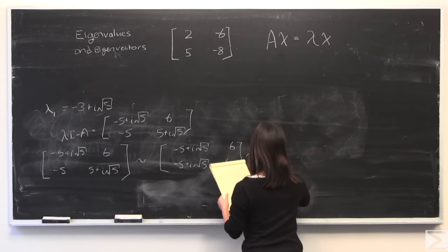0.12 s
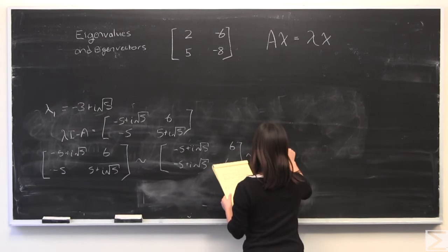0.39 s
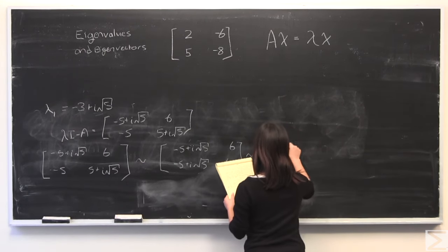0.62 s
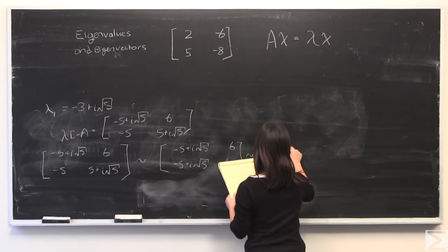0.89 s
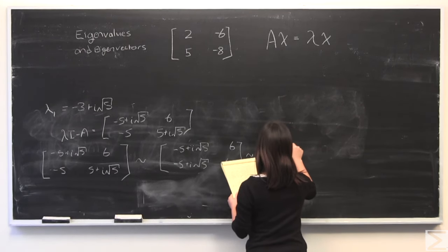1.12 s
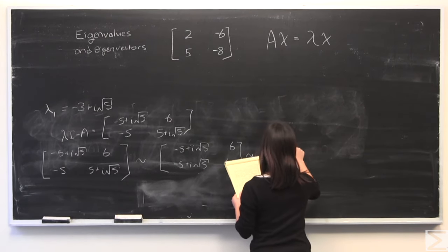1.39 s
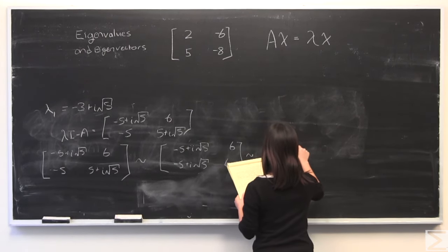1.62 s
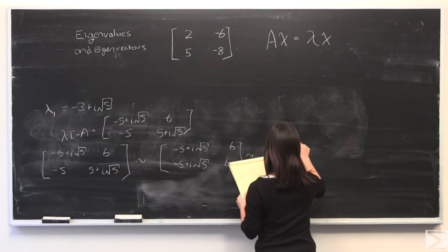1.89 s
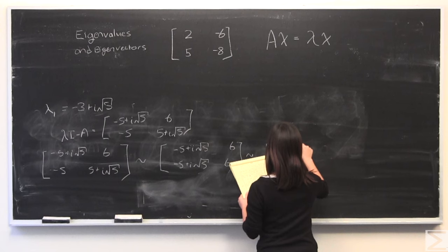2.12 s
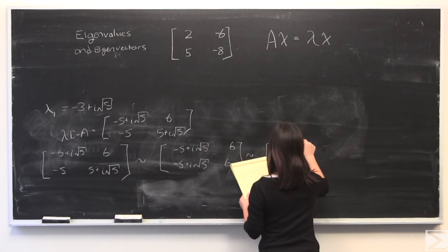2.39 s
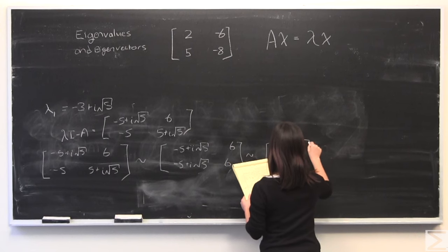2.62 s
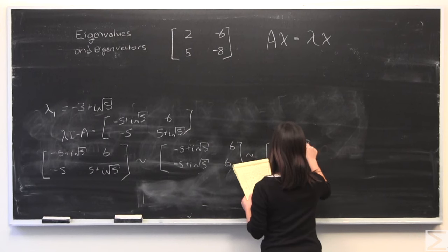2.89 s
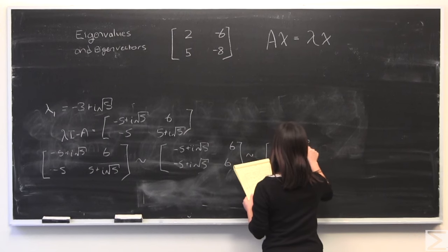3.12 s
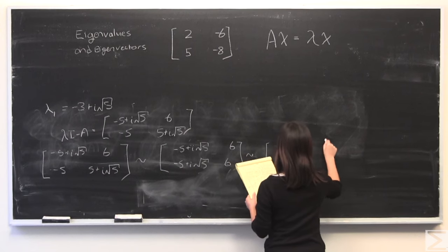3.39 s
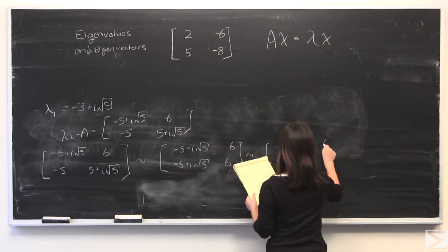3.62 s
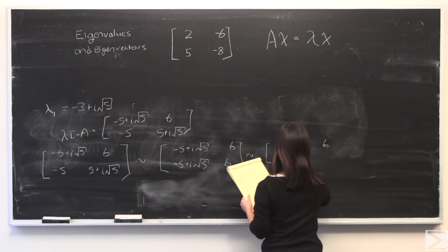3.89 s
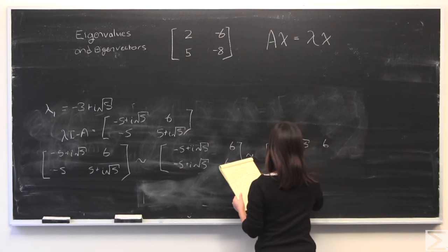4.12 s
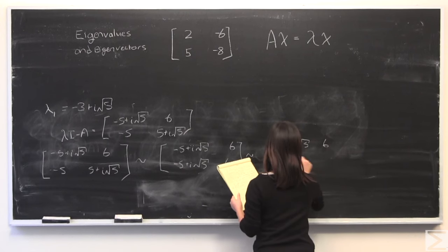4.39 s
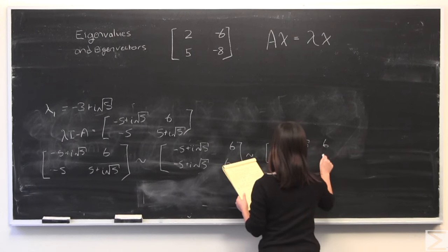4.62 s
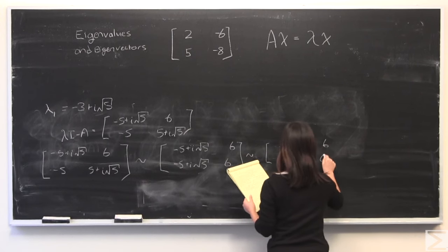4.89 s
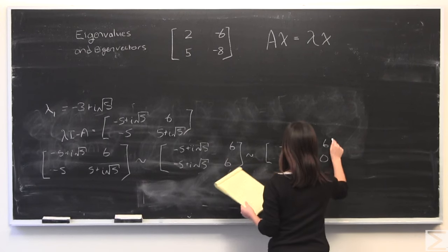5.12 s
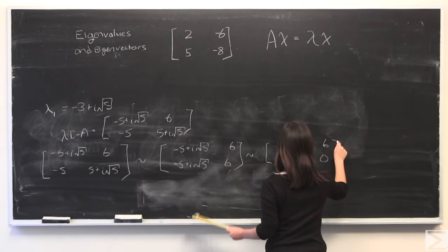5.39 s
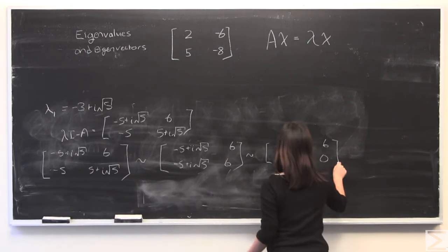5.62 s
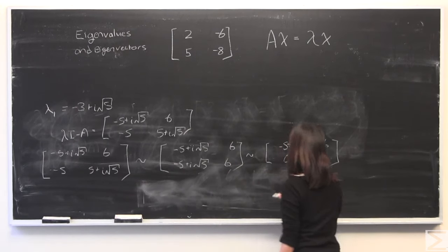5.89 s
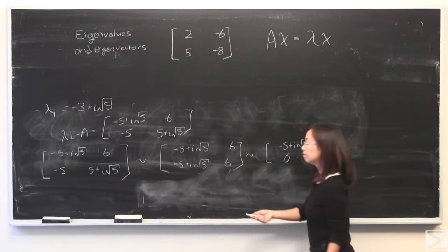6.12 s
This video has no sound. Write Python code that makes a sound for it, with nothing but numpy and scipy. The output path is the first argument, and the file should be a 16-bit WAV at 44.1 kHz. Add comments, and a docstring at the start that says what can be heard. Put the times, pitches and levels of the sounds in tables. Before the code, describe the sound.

In a small classroom, a stick of chalk strikes a blackboard with loud, woody, sharp taps at uneven intervals, each followed by a short room ring. Faint dry scrapes and barely audible squeaks accompany the strokes. Near the end come tiny ticks, two soft dull knocks on the ledge and light rustling. One distant microphone hears it over low ventilation hum and slight hiss.

```python
"""In a small classroom a stick of chalk taps and scrapes softly on a blackboard; soft knocks and rustles follow.
Taps and knocks ring damped modes of the board; scrapes, rustles and faint squeaks are shaped friction noise.
The writer's body dulls the direct knock; walls and ceiling return it brighter, then the room rings out.
One distant microphone feeds both channels over a ventilation hum of narrow tones and shaped noise;
each channel adds its own hiss."""
import sys
import numpy as np
from scipy import signal
from scipy.io import wavfile
from scipy.ndimage import uniform_filter1d

SR = 44100
rng = np.random.default_rng(int(sys.argv[2]) if len(sys.argv) > 2 else 0)


def convert_level_to_amplitude(level_db):
    """Map a level in decibels to its linear amplitude factor."""
    exponent = np.asarray(level_db, float) / 20
    return 10 ** exponent


def log_audio(samples):
    """Write samples as a 16-bit WAV file to the path given in sys.argv[1]."""
    # one column per channel
    frames = np.atleast_2d(samples).T
    # limit to full scale, then quantise
    limited = np.clip(frames, -1, 1)
    pcm = np.round(limited * 32767).astype(np.int16)
    wavfile.write(sys.argv[1], SR, pcm)


N = 276066


def evened(x):
    """Normalization: scales to an rms of 1."""
    return x / np.sqrt(np.mean(x ** 2) + 1e-20)


def read(points, hz):
    """Interpolation of a spectrum table on a log-frequency axis."""
    f, value = np.transpose(points)
    return np.interp(np.log(hz + 1), np.log(f + 1), value)


def add(mix, s, sound):
    """Superposition: mixes a sound in at time s."""
    part = mix[round(s * SR):][:len(sound)]
    part += sound[:len(part)]


def noise(shape_db, length, size):
    """Spectral shaping: random short-time spectra under a level shape_db(hz, t)."""
    hop = size // 4
    hz = np.fft.rfftfreq(size, 1 / SR)[:, None]
    t = np.arange(4 * length // size + 5) * size / 4 / SR
    real, imaginary = rng.standard_normal((len(t), len(hz), 2)).T
    spectra = (real + 1j * imaginary) * convert_level_to_amplitude(shape_db(hz, t))
    return signal.istft(spectra, nperseg=size, noverlap=size - hop)[1][:length]


def steady_noise(points, size):
    """Stationary noise of rms 1 with the tabled spectrum, as long as the scene."""
    return evened(noise(lambda hz, t: read(points, hz) + 0 * t, N, size))


# Spectrum of the amplifier hiss. Each row: frequency in Hz, relative density in dB.
HISS_SPECTRUM = [(15, -28.5), (25, 2), (244, -7), (347, -6.5), (377, -8), (921, -11.5), (5990, -10.5),
                 (13900, -13), (15100, -17.5), (16300, -46)]
HISS_DB = -59.5  # rms level


def amplifier_hiss():
    """Electronic noise: a stationary random signal, independent in each channel."""
    return convert_level_to_amplitude(HISS_DB) * steady_noise(HISS_SPECTRUM, size=1024)


# Faint steady tones beside the hum, probably mains. Each row: frequency in Hz, peak level in dB.
FAINT_TONES = [(180, -71), (240, -71.5)]


def faint_tones():
    """Pure tones: each is a steady sinusoid of random phase."""
    t = np.arange(N) / SR
    return sum(convert_level_to_amplitude(db) * np.sin(2 * np.pi * (hz * t + rng.random())) for hz, db in FAINT_TONES)


def ventilation_hum():
    """Narrow-band modulation: a strong steady tone plus slow random sidebands wavers a little."""
    hum_hz, width_hz, level_db = 152.7, 27, -59
    turn = np.exp(2j * np.pi * hum_hz * np.arange(N) / SR)
    pole = np.exp(-np.pi * width_hz / SR)
    waver = signal.lfilter([1], [1, -pole], rng.standard_normal(N) / turn)
    waver = signal.lfilter([1], [1, -pole ** 12.0], waver)
    steady = 8.1  # against a waver of 1
    return convert_level_to_amplitude(level_db) * evened((turn * (steady + waver / np.std(waver))).real)


# Spectrum of the soft air noise. Each row: frequency in Hz, relative density in dB.
AIR_SPECTRUM = [(80, -26.5), (120, 4), (200, 0.1), (330, -7), (450, -10), (700, -16.5), (1500, -20),
                (3000, -47)]
AIR_DB = -61  # rms level


def ventilation_air():
    """Flow noise: a stationary broad spectrum that falls towards the treble."""
    return convert_level_to_amplitude(AIR_DB) * steady_noise(AIR_SPECTRUM, size=2048)


# Brief swells of the rumble. Each row: centre in seconds, half width in seconds, rise in dB.
RUMBLE_SWELLS = [(1.15, 0.13, 11.5), (1.34, 0.049, 8), (2.548, .2, 2)]


def rumble_level_db():
    """Slow amplitude modulation: a sinking level with a random wander and a few swells."""
    start_db, sink_db_per_s, wander_rms_db = -58, -1.34, 3
    t = np.arange(N) / SR
    waves = [np.sin(2 * np.pi * (f * t + rng.random())) / np.sqrt(f) for f in np.geomspace(1, 5, num=16)]
    wander = evened(sum(waves))
    swells = sum(db * np.exp(-((t - s) / width) ** 2) for s, width, db in RUMBLE_SWELLS)
    return start_db + sink_db_per_s * t + wander_rms_db * wander + swells


# Spectrum of the low rumble. Each row: frequency in Hz, relative density in dB.
RUMBLE_SPECTRUM = [(15, -16), (30, -5), (55, 4.3), (90, -13.5), (130, -15), (200, -54)]


def rumble():
    """Low-frequency noise: a stationary spectrum under a slowly moving level."""
    return convert_level_to_amplitude(rumble_level_db()) * steady_noise(RUMBLE_SPECTRUM, size=4096)


def blow(hz, hardness_db, body_db):
    """Contact hardness: a hard blow tilts the treble up; a loose part of the board gives more low body."""
    tilt_db = hardness_db * np.log2(1 + (hz / 1400) ** 2) / 2
    return tilt_db + body_db / (1 + (hz / 700) ** 4)


# Decay of the room. Each row: frequency in Hz, time to fall by 60 dB in seconds.
ROOM_T60 = [(40, 1), (160, 0.3856), (420, 0.42), (1100, 0.3579), (2900, 0.2879), (5000, 0.2376),
            (8000, 0.3652), (14000, 0.16)]
# Colour of the ring. Each row: frequency in Hz, relative level in dB.
ROOM_COLOUR = [(20, -42), (50, -23.5), (134, -7.5), (280, -17), (450, -2), (600, -3), (1040, -1),
               (1500, -2.5), (1860, -8), (2480, -9.5), (4200, -22), (5000, -17), (7090, -36.5),
               (13700, -52.5)]


def room(db, pitch, hardness_db, body_db):
    """Reverberation: a dense ring, new for each blow, in which each band dies at its own speed."""
    late_db, late_slower = -19.5, 2.2  # a weaker second stage falls this many times slower
    t = np.arange(SR * 3 // 4) / SR

    def shape(hz, t):
        # some modes are struck harder
        ripple_db = 1.9 * evened(uniform_filter1d(rng.standard_normal(hz.shape), size=3, axis=0))
        early_fall_db = -60 * t / read(ROOM_T60, hz)
        late_fall_db = late_db + early_fall_db / late_slower
        fall_db = 10 * np.log10(convert_level_to_amplitude(2 * early_fall_db) + convert_level_to_amplitude(2 * late_fall_db))  # powers add
        return read(ROOM_COLOUR, hz / pitch) + blow(hz, hardness_db, body_db) + ripple_db + fall_db

    ring = noise(shape, len(t), size=1024)
    build = 1 - np.exp(-(t / .005) ** 2)  # builds up as reflections arrive
    return convert_level_to_amplitude(db) * build * ring / np.std(ring[:SR // 20])


# Near surfaces. Each row: nominal delay in ms (the filter below adds 0.34 ms), level beside the direct
# knock in dB, extra lift around 5 kHz in dB.
NEAR_SURFACES = [(1.052, 0, -3), (1.989, 6, -3), (4.647, -4, 4.5), (8.086, -3, 9.5), (11.564, -9, 10.5),
                 (14.83, -8, 13), (23.46, -24, 2.5)]


def echoes(sound):
    """Specular reflection: a few clear returns, most of them brighter than the shadowed direct path."""
    path = signal.unit_impulse(SR // 20)
    treble = signal.firwin(31, [3800, 6600], pass_zero=False, fs=SR)
    click = signal.unit_impulse(31, "mid")
    shifts = rng.uniform(-1, 1, len(NEAR_SURFACES))
    for (ms, db, lift_db), shift in zip(NEAR_SURFACES, shifts):
        reflection = (convert_level_to_amplitude(lift_db) - 1) * treble + click
        add(path, ms * (1 + .03 * shift) / 1000, convert_level_to_amplitude(db) * reflection)
    return signal.fftconvolve(sound, path)


# What the board rings with. Each row: frequency in Hz, relative level in dB, time to fall by 60 dB in seconds.
BOARD_MODES = [(50, -30, 0.037), (172, -39, 0.03), (257, -18.5, 0.043), (412.5, -38.5, 0.13),
               (529, -25.5, 0.14), (575, -10, 0.0089), (725, -0.5, 0.0062), (1063, 3, 0.0071),
               (1349, 0, 0.0062), (1736, -17, 0.009), (2259, -5, 0.0045), (3710, -18.5, 0.0054),
               (5440, -7.5, 0.0021), (7100, -22, 0.0029), (10900, -45.5, 0.0027)]


def tap(db, pitch, hardness_db, body_db, chance):
    """Modal excitation: a short push rings the board's damped modes; each blow weighs them anew."""
    crack_gain_db, crack_t60 = -48, .015  # the first touch of chalk, beside the knock
    t = np.arange(SR // 3) / SR
    hz, mode_db, t60 = np.transpose(BOARD_MODES)[:, :, None]
    mode_db = mode_db + blow(hz, hardness_db, body_db) + 1.5 * chance[:, None]
    modes = convert_level_to_amplitude(mode_db - 60 * t / t60) * np.sin(2 * np.pi * hz * pitch * t)
    stiffening = 1 - np.exp(-(t / 0.0005) ** 2)  # the contact takes a moment to stiffen
    ring = echoes(-modes.sum(0) * stiffening)[:len(t)]
    grit = np.convolve(rng.standard_normal(len(t)), [1, 1, -1, -1], "same")
    crack = convert_level_to_amplitude(crack_gain_db + 2.1 * hardness_db - 60 * t / crack_t60) * grit
    return convert_level_to_amplitude(db) * (ring / abs(ring).max() + crack)


def add_blows(mix, blows, room_db):
    """Impact in a room: each blow sounds directly and stirs the reverberation, room_db beside it."""
    chances = rng.standard_normal((len(blows), len(BOARD_MODES)))
    for (s, db, *colour), chance in zip(blows, chances):
        add(mix, s, tap(db, *colour, chance))
        add(mix, s, room(db + room_db, *colour))


# Spectrum of chalk friction. Each row: frequency in Hz, relative density in dB.
SCRAPE_SPECTRUM = [(200, -28), (500, 0.5), (1100, -4), (1700, -5.5), (2300, -5.5), (3300, -10.5),
                   (5200, -10.5), (7500, -20.5), (14000, -36)]


def friction(start, loudest, db, bright, fade_s):
    """Friction: dense uneven grains, coloured by the board, swell with speed and fade; half a second at most."""
    t = np.arange(SR // 2) / SR
    flicker = evened(uniform_filter1d(rng.standard_normal(len(t)), size=4))

    def shape(hz, frames):
        tilt_db = bright * np.log2(hz / 2000 + 0.023)
        return read(SCRAPE_SPECTRUM, hz) + tilt_db + 2.7 * flicker[:len(frames)]

    speed = np.interp(t + start, [start, loudest, loudest + fade_s], [0, 1, 0]) ** 0.39
    sound = convert_level_to_amplitude(db) * speed * evened(noise(shape, len(t), size=256))
    return sound[round(max(-start, 0) * SR):]  # drops what lies before time zero


# Soft rustles once the writing is done. Each row: start in seconds, loudest moment in seconds, level in dB,
# brightness in dB per octave, fade in seconds.
RUSTLES = [(5.569, 5.633, -58.5, 5, 0.072), (5.785, 5.83, -52.5, -3.5, 0.027),
           (5.84, 5.896, -63.5, -1.5, .9)]


def add_rustles(mix):
    """Sliding friction: the grains of a scrape, each rustle with its own fade."""
    for row in RUSTLES:
        add(mix, row[0], friction(*row))


# Soft dull knocks as things are set down on the board's ledge. Each row: start in seconds, peak in dB,
# board pitch as a factor of the room's colour and the modes, hardness in dB per octave, low body in dB.
LEDGE_KNOCKS = [(5.626, -32, 1.0, -16, -1.5), (5.8275, -23, 0.82, -27, -8.5)]


def add_knocks(mix):
    """Soft impact: a yielding contact excites little treble and stirs the room less."""
    add_blows(mix, LEDGE_KNOCKS, room_db=-28)


# Small dry ticks. Each row: start in seconds, level in dB before the decay, pitch in Hz.
TICKS = [(2.1188, -16, 2010), (2.431, -39.5, 1800), (5.045, -44, 2780), (5.152, -42, 2740),
         (5.306, -23, 4450), (5.3374, -23.5, 5900), (5.3494, -20, 6040), (5.3945, -34, 6300),
         (5.63, -34, 4500), (5.955, -35, 2040)]


def add_ticks(mix):
    """Heavily damped oscillation: a few milliseconds of a dying sinusoid, with no body."""
    t = np.arange(SR // 100) / SR
    for s, db, hz in TICKS:
        envelope = convert_level_to_amplitude(db - 60 * t / .003) * (1 - np.exp(-t / .0001))
        add(mix, s, envelope * np.sin(2 * np.pi * hz * t))


def squeak(start, end, hz, db):
    """Resonance: friction noise in one narrow band, fading in and out."""
    width_hz = 45
    t = np.arange(SR // 4) / SR
    grains = rng.standard_normal((len(t), 2)) @ [1, 1j]
    wobble = signal.lfilter([1], [1, -np.exp(-np.pi * width_hz / SR)], grains)
    fade = np.sin(np.pi * np.clip(t / (end - start), 0, 1))
    return convert_level_to_amplitude(db) * fade * evened((wobble * np.exp(2j * np.pi * hz * t)).real)


# Faint squeaks as the stick chatters. Each row: start in seconds, end in seconds, pitch in Hz, level in dB.
SQUEAKS = [(.07, 0.123, 3400, -67), (0.364, 0.506, 3650, -70), (1.063, 1.16, 2250, -65),
           (1.055, 1.177, 1480, -63), (2.513, 2.59, 2150, -62), (2.629, 2.69, 5000, -70),
           (3.627, 3.764, 2250, -61.5), (4.28, 4.4, 2450, -66.5), (5.62, 5.685, 2800, -61)]


def add_squeaks(mix):
    """Chatter: each squeak is a separate burst of resonant friction."""
    for row in SQUEAKS:
        add(mix, row[0], squeak(*row))


# Chalk dragged along the board. Each row: start in seconds, loudest moment in seconds, level in dB,
# brightness in dB per octave.
STROKES = [(-.1, 0.086, -60, 1), (0.807, 1.098, -60.5, -1.3), (2.41, 2.49, -59.5, .1),
           (2.615, 2.647, -62.5, 7), (2.927, 3.2, -62, -0.9), (3.485, 3.72, -59.5, 0.5),
           (4.104, 4.336, -58, 0.5), (4.722, 4.939, -57.5, 0.5), (5.297, 5.47, -63, 3.1)]


def add_strokes(mix):
    """Sliding friction: the scrape follows the speed of the hand and ends as the chalk lifts."""
    lift_s = 0.11  # from the fastest point of a stroke until the chalk leaves the board
    for row in STROKES:
        add(mix, max(row[0], 0), friction(*row, lift_s))


# Chalk meeting the board, firm landings and light touches. Each row: start in seconds, peak in dB,
# board pitch as a factor, hardness in dB per octave, low body in dB.
CHALK_TAPS = [(.051, -32, 0.87, -12, 5.5), (0.5389, -1, 0.92, -1, -3.5), (0.8045, -3, 1.005, 0.5, -1.7),
              (1.2871, -2.5, 0.94, 1.5, -3.3), (1.5024, -1.5, 0.99, 0.7, -3),
              (1.6951, -4.5, 0.97, 2.5, -2.5), (1.9403, 0, 0.99, -0.7, -1), (2.1251, -5, 0.97, 2.5, -1.2),
              (2.465, -39.5, 1.02, -12.5, -14.5), (2.663, -41, 0.91, -11, 4), (2.9268, -2, 0.97, 2, -2),
              (3.4854, -3, 1, 1.2, -0.5), (4.1067, -0.4, 0.96, -0.8, -2.1), (4.7137, 0.5, 0.99, 2.2, 0.1),
              (5.291, 0, 0.97, 3, 1.5)]


def add_taps(mix):
    """Impact: the chalk strikes the board and the small room rings out after it."""
    add_blows(mix, CHALK_TAPS, room_db=-22.5)


def scene():
    """Superposition: everything reaches one microphone, which feeds both channels."""
    mix = faint_tones() + ventilation_hum() + ventilation_air() + rumble()
    add_rustles(mix)
    add_knocks(mix)
    add_ticks(mix)
    add_squeaks(mix)
    add_strokes(mix)
    add_taps(mix)
    return np.array([mix, mix])


def roll_off(x):
    """The treble ends steeply here."""
    return signal.sosfilt(signal.butter(12, 16480, fs=SR, output="sos"), x)


def record(dry):
    """Saturation and filtering: the deepest bass is lost, tall peaks are rounded, hiss joins, a band limit follows."""
    bass_cut_hz, edge_hz = 63, 16450
    ceiling = .95  # the input stage rounds off the tallest peaks
    hiss = np.array([amplifier_hiss() for _ in dry])
    picked_up = signal.lfilter(*signal.butter(2, bass_cut_hz, "high", fs=SR), dry)
    amplified = ceiling * np.tanh(picked_up / ceiling) + hiss
    band_limit = signal.firwin(511, edge_hz, window=("kaiser", 9), fs=SR)
    finished = signal.oaconvolve(amplified, band_limit[None], "same")
    return roll_off(finished)


dry = scene()
out = record(dry)
log_audio(out)
```